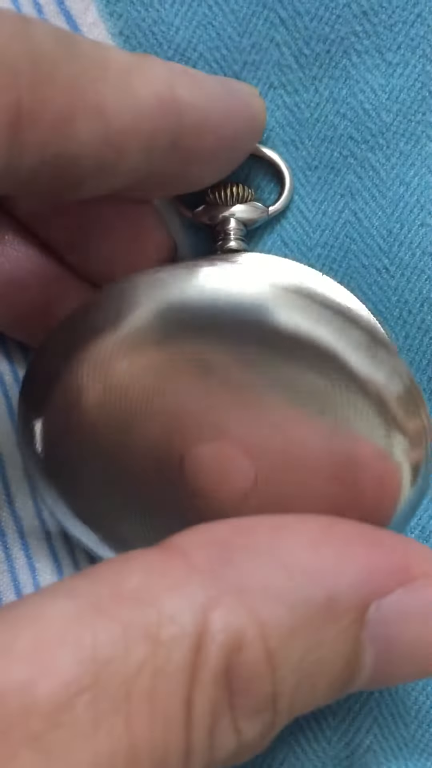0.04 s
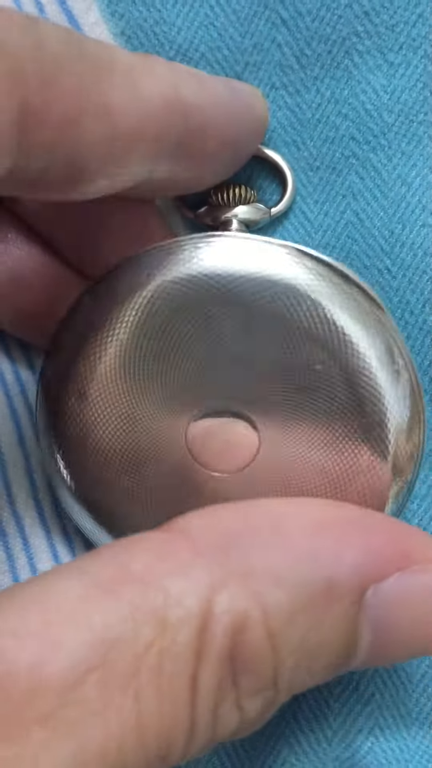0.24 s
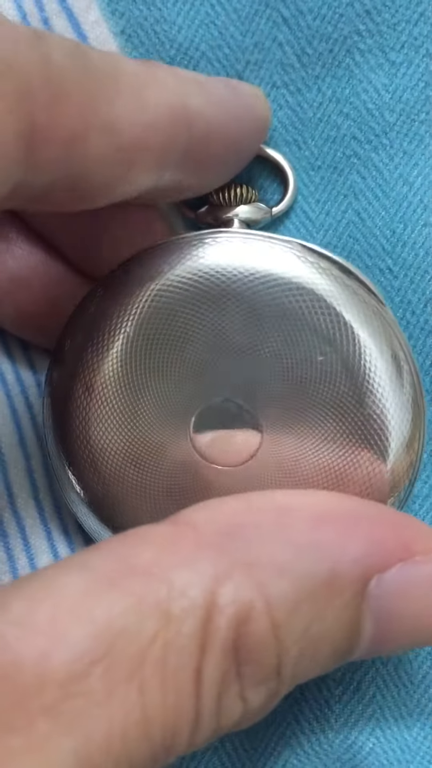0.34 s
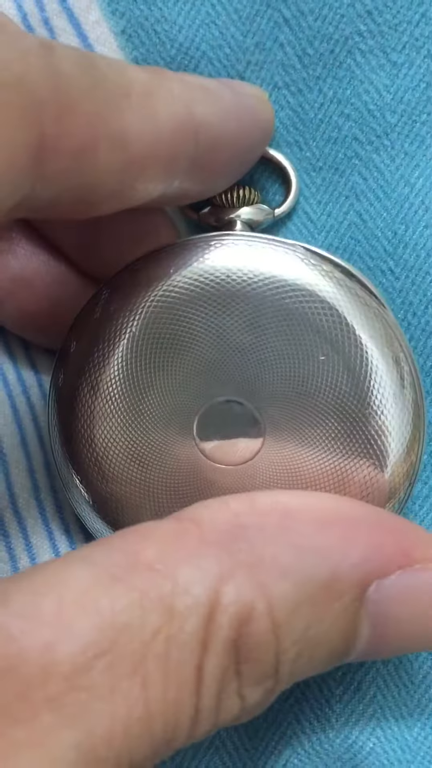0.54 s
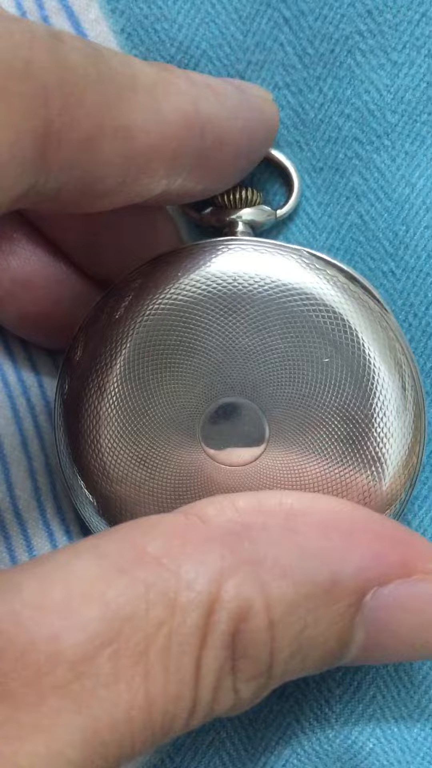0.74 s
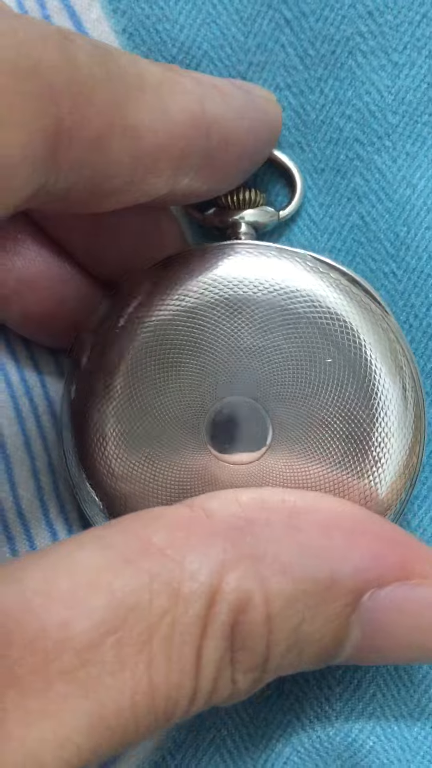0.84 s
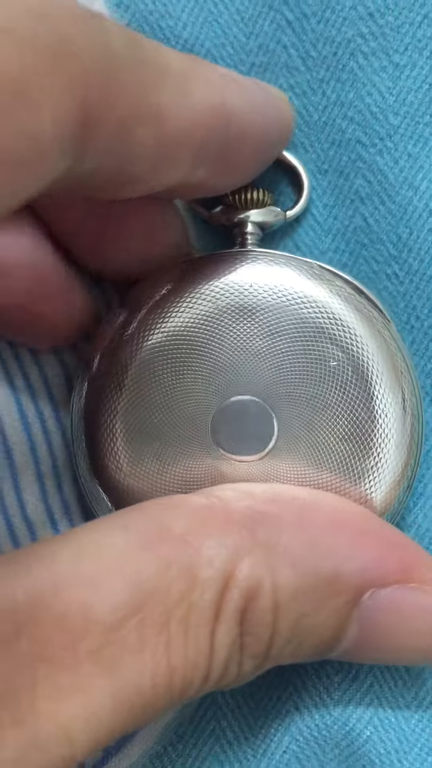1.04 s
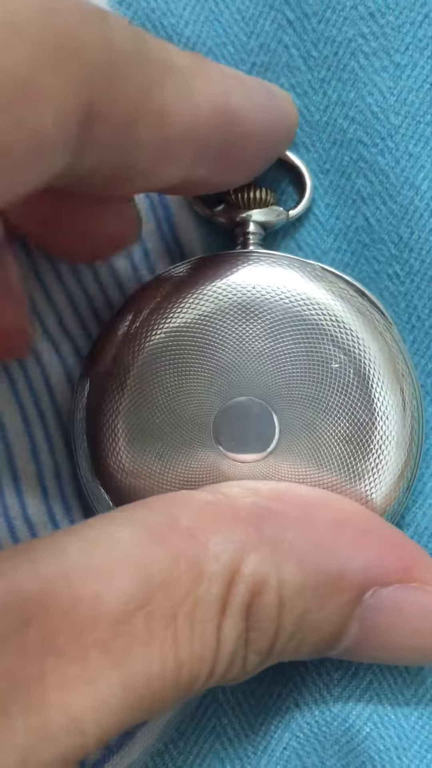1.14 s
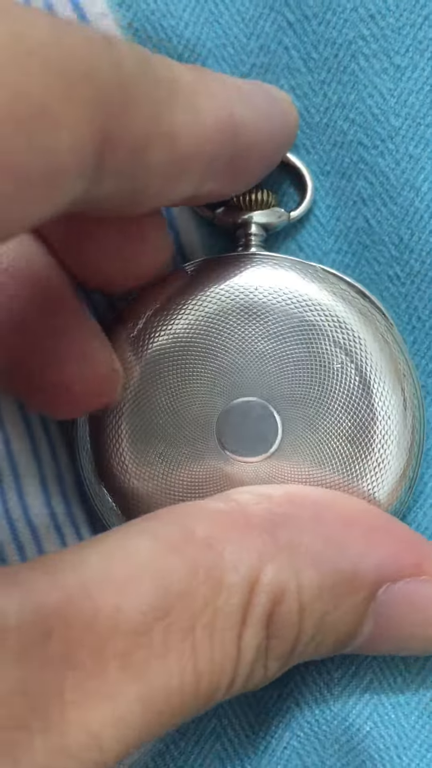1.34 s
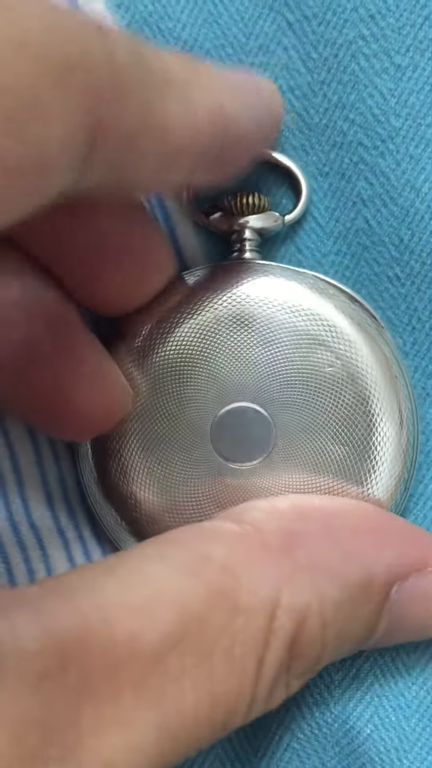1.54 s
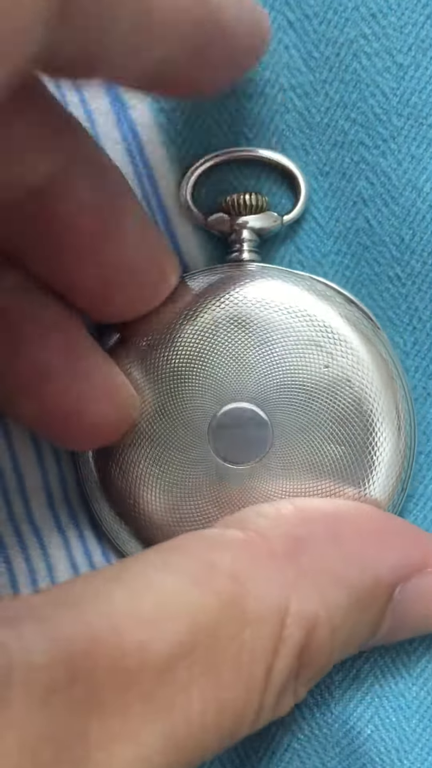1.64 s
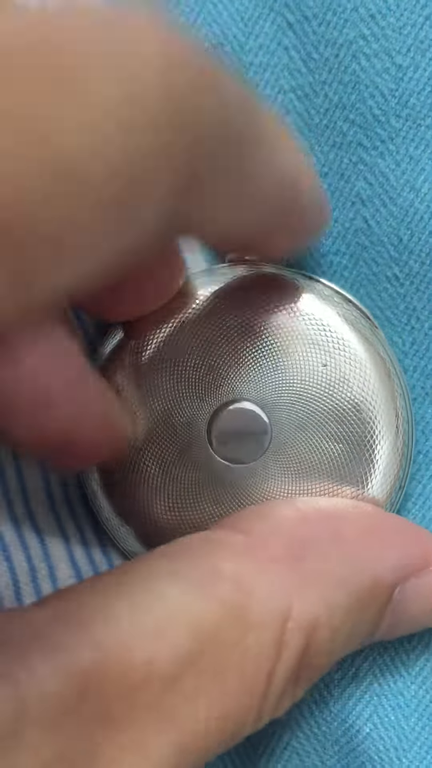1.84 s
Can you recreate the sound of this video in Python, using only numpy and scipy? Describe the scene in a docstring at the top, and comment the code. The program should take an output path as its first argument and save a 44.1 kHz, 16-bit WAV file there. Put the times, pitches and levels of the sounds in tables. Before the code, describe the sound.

A metal pocket watch lid snaps shut with a sharp click, then faint finger taps follow.

```python
"""The metal back of a pocket watch is pressed shut on a cloth, close up in a small quiet room.
The lid snaps over its rim: friction gives a crack, impact excites a short ring of normal modes,
and the recoil thumps into the hand. Later the fingers lightly tap the closed, damped case.
Throughout, the escapement ticks faintly over a low handling rumble and room noise."""
import sys
import numpy as np
from scipy import signal
from scipy.fft import rfft, irfft
from scipy.io import wavfile

SR = 44100
rng = np.random.default_rng(int(sys.argv[2]) if len(sys.argv) > 2 else 0)


def generate_wav(sig):
    """Save sig (samples, or channels by samples) to the path in sys.argv[1] as 16-bit PCM at SR."""
    pcm = np.round(np.clip(np.atleast_2d(sig).T, -1, 1) * 32767).astype(np.int16)
    wavfile.write(sys.argv[1], SR, pcm)


N = 83790
T = np.arange(N) / SR


def from_db(db):
    """Amplitude ratio: tenfold for every 20 dB."""
    return 10 ** (np.asarray(db) / 20)


def low_pass(x, hz):
    """Second-order Butterworth roll-off above hz."""
    return signal.sosfilt(signal.butter(2, np.clip(hz, 20, .45 * SR), fs=SR, output="sos"), x + 1e-18)


def noise(spectrum):
    """Spectral shaping of white noise, scaled to unit rms."""
    hz, db = np.transpose(spectrum)
    bins = np.maximum(np.arange(N // 2 + 1) * SR / N, 1)
    gain = from_db(np.interp(np.log(bins), np.log(hz), db))
    x = irfft(rfft(rng.standard_normal(N)) * gain, N)
    return x / x.std()


def impulse(s):
    """An ideal impact: one unit sample at time s."""
    return 1.0 * (np.arange(N) == int(s * SR))


def decay(s, t60):
    """Exponential decay from time s, falling 60 dB in t60 seconds."""
    return (T >= s) * np.exp(-np.log(1000) * np.maximum(T - s, 0) / t60)


def ring(force, modes):
    """Modal superposition: the force drives damped oscillators of alternating sign."""
    out = np.zeros(N)
    for k, (hz, db, t60) in enumerate(modes):
        r, w = np.exp(-np.log(1000) / (t60 * SR)), 2 * np.pi * hz / SR
        mode = signal.lfilter([0, np.sin(w)], [1, -2 * r * np.cos(w), r * r], force + 1e-18)
        out += (-1) ** k * from_db(db) * mode
    return out


def band_pass(x, hz, stage_width_hz):
    """Two resonators in cascade, each with a peak gain of 1."""
    r = np.exp(-np.pi * stage_width_hz / SR)
    feedback = [1, -2 * r * np.cos(2 * np.pi * hz / SR), r * r]
    for _ in range(2):
        x = (1 - r * r) / 2 * signal.lfilter([1, 0, -1], feedback, x + 1e-18)
    return x


# Room noise spectrum: (frequency [Hz], relative density [dB])
ROOM_NOISE = [(15, -53), (25, -22.5), (36, -6.5), (49, -2.5), (114, -6), (195, -4), (317, -18.5),
              (354, -14.5), (463, -25.5), (503, -22.5), (734, -25.5), (796, -24.5), (1700, -26.5),
              (1890, -26.5), (16000, -44)]
def room_noise():
    """Stationary noise, strongest in the bass, forms the room's noise floor."""
    return from_db(-60.5) * noise(ROOM_NOISE)


# Rumble envelope: (time [s], relative level [dB])
RUMBLE_ENVELOPE = [(0.0, -71), (0.042, -57), (0.104, -78), (0.21, -45.5), (0.358, -69.5), (0.65, -73.5),
                   (0.74, -82), (0.766, -63), (0.894, -72), (1.036, -74.5), (1.068, -60), (1.21, -89),
                   (1.406, -58), (1.428, -67), (1.512, -73), (1.54, -62), (1.856, -65.5), (1.9, -70.5)]
# Rumble spectrum: (frequency [Hz], relative density [dB])
RUMBLE_SPECTRUM = [(25, -28), (45, -10), (60, 3.5), (85, -4), (130, -17.5), (300, -46)]
# Hand bumps: (time [s], frequency [Hz], level [dB], duration [s])
HAND_BUMPS = [(0.045, 67.6, -45, 0.016), (0.16, 65, -52.5, 0.059), (0.325, 182, -53, 0.034),
              (0.772, 74.5, -53, 0.044), (0.848, 57.7, -52, 0.072), (0.908, 64.5, -46, 0.029),
              (1.064, 63, -51.5, 0.042), (1.17, 142.3, -57, 0.045), (1.381, 68.5, -55, 0.03),
              (1.508, 121, -48, 0.027)]
def handling():
    """Soft contact excites low frequencies: the moving hands rumble and bump in Gaussian tone pulses."""
    out = from_db(np.interp(T, *np.transpose(RUMBLE_ENVELOPE)) - 1) * noise(RUMBLE_SPECTRUM)
    for s, hz, db, duration in HAND_BUMPS:
        pulse = np.exp(-(2 * (T - s) / duration) ** 2)
        out += from_db(db) * pulse * np.sin(2 * np.pi * hz * (T - s))
    return out


# Tick spectrum: (frequency [Hz], relative density [dB])
TICK_SPECTRUM = [(1000, -15), (2600, -26), (4600, 6), (7800, -14), (8700, 12), (10500, -22), (11600, -4),
                 (13500, 3), (15000, 5)]
def escapement(first_s=.0915, period_s=.2002):
    """Periodic impacts in the movement give five tiny, bright noise bursts a second."""
    beats = np.arange(first_s, T[-1], period_s)
    envelope = sum(from_db(-61.5 + rng.normal(0, .5)) * decay(s, t60=.005) for s in beats)
    return envelope * noise(TICK_SPECTRUM)


# The lid catches, slips over the rim, seats and settles:
# (time [s], relative level [dB], contact cutoff [Hz], grinding offset [dB])
LID_CONTACTS = [(0.2151, 0, 15000, -15), (0.2162, -8, 9000, -12), (0.2194, -9, 2100, -9),
                (0.2357, -33, 12000, -6), (0.2378, -23, 5500, -8), (0.2407, -25, 1900, -7)]
# Grinding spectrum of the rim: (frequency [Hz], relative density [dB])
GRIND_SPECTRUM = [(300, -14), (700, -11), (1500, -2.5), (3000, -2), (3700, 1.5), (5200, -2.5),
                  (5900, -24.5), (6900, -5), (8500, -14.5), (12000, -17), (15000, -9)]
# Modes of lid and case: (frequency [Hz], gain [dB], T60 [s])
LID_MODES = [(1052, -29, .04), (1186.5, -26, .055), (1479.4, -17, .065), (1845, -28, .03),
             (2146, -17, .048), (2770, -23, 0.03), (3030, -29, 0.037), (3488, -16.5, 0.021),
             (3903, -18.5, 0.083), (4080, -21.5, .035), (4670, -21, .03), (5150, -25.5, 0.021),
             (5360, -23, .031), (6700, -20, .016), (9300, -33, 0.028), (10400, -38, .022),
             (13610, -33.5, 0.034), (15080, -30.5, .018)]
# Modes of the watch against hand and cloth: (frequency [Hz], gain [dB], T60 [s])
THUMP_MODES = [(175, -29, 0.052), (234.5, -25.5, 0.036), (500, -34.5, 0.027), (810, -35, 0.0087)]
SNAP_S = LID_CONTACTS[0][0]
def snap(thump_s=.2165, cutoff_s=.241):
    """Impact and friction: the rim grinds, the watch thumps, the lid's ring is cut off quickly."""
    force, crack = np.zeros(N), np.zeros(N)
    for s, db, cutoff_hz, grind_db in LID_CONTACTS:
        force += from_db(db) * low_pass(impulse(s), cutoff_hz)
        friction = noise(GRIND_SPECTRUM) * decay(s, t60=.023)
        crack += from_db(db + grind_db + 1) * low_pass(friction, cutoff_hz)
    quick_fade = (T < cutoff_s) + decay(cutoff_s, t60=.03)
    thump = ring(impulse(thump_s), THUMP_MODES)
    return ring(force, LID_MODES) * quick_fade + crack + thump


# Clusters of lid partials: (centre frequency [Hz], initial level [dB])
PARTIAL_CLUSTERS = [(2180, -59.5), (3860, -56.5), (6878, -55.5), (9330, -64), (13650, -71.5)]
def shimmer():
    """Beating of close partials, modelled as narrow noise bands, follows the snap and dies away."""
    out = np.zeros(N)
    for hz, db in PARTIAL_CLUSTERS:
        cluster = band_pass(rng.standard_normal(N), hz, stage_width_hz=300)
        out += from_db(db) * cluster / cluster.std()
    return out * decay(SNAP_S, t60=.26)


ROOM_DELAY_S, ROOM_T60_S = .006, .3
def reverberation(x, early_end_s=.024):
    """Convolution with the room's impulse response adds early reflections and a faint diffuse tail."""
    early = rng.standard_normal(N) * (T > ROOM_DELAY_S) * (T < early_end_s)
    tail = rng.standard_normal(N) * decay(ROOM_DELAY_S, ROOM_T60_S)
    response = (from_db(-21.5) * low_pass(early / np.linalg.norm(early), hz=4500)
                + from_db(-35) * low_pass(tail / np.linalg.norm(tail), hz=9000))
    return signal.fftconvolve(x, response)[:N]


# Spectrum of the scattered crack: (frequency [Hz], relative density [dB])
SCATTER_SPECTRUM = [(400, -8), (1000, -3), (1600, 0), (2800, -1), (4400, -2), (6000, -10), (7200, -6),
                    (11000, -15), (15000, -13)]
def scattered_crack():
    """Diffuse scattering round the room turns the crack into a soft, decaying hiss."""
    return from_db(-49) * noise(SCATTER_SPECTRUM) * decay(SNAP_S + ROOM_DELAY_S, ROOM_T60_S)


# Touches of finger and nail:
# (time [s], relative level [dB], knock centre [Hz], tick offset [dB], thud offset [dB])
TOUCHES = [(1.4018, -13, 2380, 0.5, -23), (1.4023, 3.5, 2250, 0.5, -14), (1.4041, -11, 2070, -8.5, -14),
           (1.4075, 2.5, 1650, -17, -20), (1.4073, -7, 1700, -4, -18), (1.5445, -8.5, 1210, -15.5, -4),
           (1.595, -8, 1280, -26, 4), (1.5981, -7, 1530, -22, -6), (1.646, -15, 1480, -24, -2),
           (1.6525, -27.5, 1500, 3.5, -6)]
# Modes of the closed case, damped by the hand: (frequency [Hz], gain [dB])
CASE_MODES = [(1060, -38), (1320, -36.5), (1704, -40), (2325, -43), (2800, -59)]
# Modes of crown and bow: (frequency [Hz], gain [dB], T60 [s])
CROWN_MODES = [(4510, -37, 0.0077), (4830, -37.5, 0.0081), (5260, -40.5, 0.015), (7470, -57, 0.017),
               (11200, -56, .01)]
# Modes of the case pushed against the hand: (frequency [Hz], gain [dB], T60 [s])
THUD_MODES = [(363, -51, 0.056), (488, -48, 0.05)]
# Contact noise spectrum: (frequency [Hz], relative density [dB])
GRIT_SPECTRUM = [(400, -2), (1500, -5), (2500, 8), (3400, -19), (5000, 0), (8000, -33), (15000, -31)]
def taps(case_t60_s=.016):
    """Impulse excitation: each touch knocks the case, ticks crown and bow, and thuds into the hand."""
    knock, tick, thud, grit = np.zeros((4, N))
    texture = noise(GRIT_SPECTRUM)
    for s, db, knock_hz, tick_db, thud_db in TOUCHES:
        knock += from_db(db) * band_pass(impulse(s), knock_hz, stage_width_hz=1180)
        tick += from_db(db + tick_db) * impulse(s)
        thud += from_db(db + thud_db) * impulse(s)
        grit += from_db(db + tick_db - 42.5) * texture * decay(s, t60=.012)
    case = ring(knock, [(hz, db, case_t60_s) for hz, db in CASE_MODES])
    return case + ring(tick, CROWN_MODES) + ring(thud, THUD_MODES) + grit


def scene():
    """Superposition of direct sound, reflections and background noise, in mono."""
    lid, fingers = snap() + shimmer(), taps()
    shielded = from_db(-6) * fingers  # the hand shields the taps from the room
    reflections = reverberation(lid + shielded) + scattered_crack()
    return (room_noise() + handling() + escapement() + lid + reflections + fingers)[None]


def record(dry, low_hz=51, high_hz=16100):
    """Band limiting: the microphone drops the deep bass, and the top is cut steeply."""
    thin = signal.sosfilt(signal.butter(4, low_hz, "high", fs=SR, output="sos"), dry)
    return signal.sosfilt(signal.ellip(10, .1, 70, high_hz, fs=SR, output="sos"), thin)


dry = scene()
out = record(dry)
generate_wav(out)
```